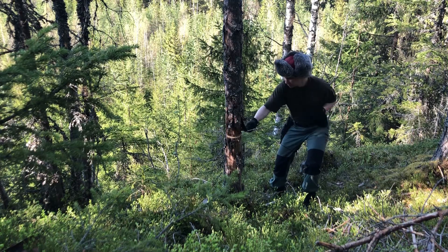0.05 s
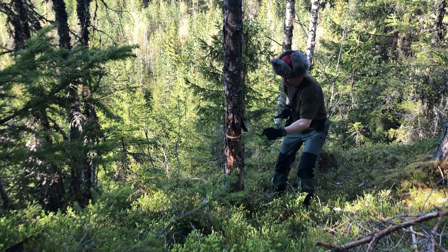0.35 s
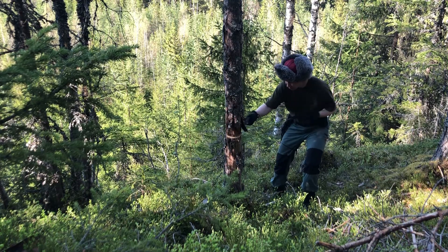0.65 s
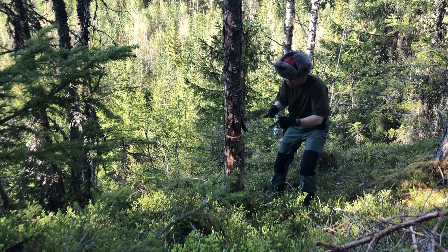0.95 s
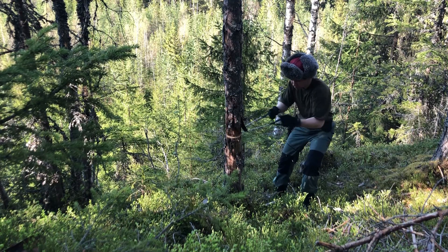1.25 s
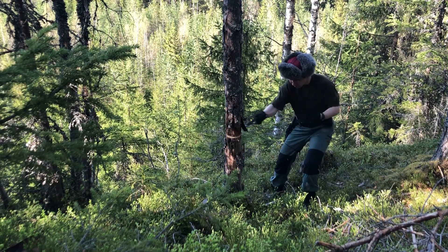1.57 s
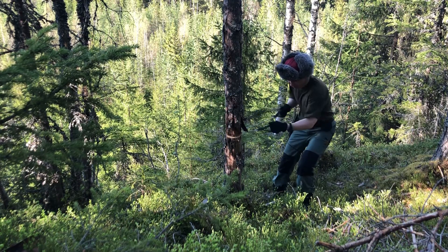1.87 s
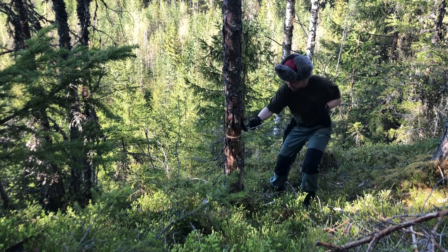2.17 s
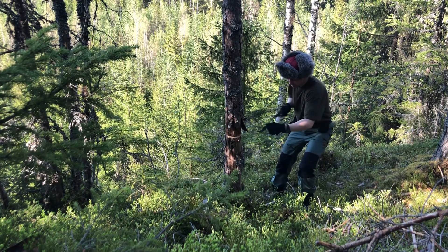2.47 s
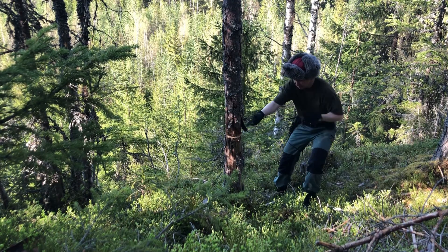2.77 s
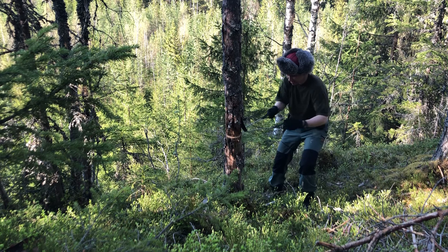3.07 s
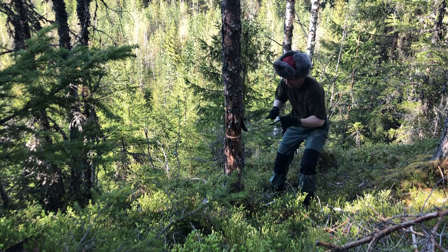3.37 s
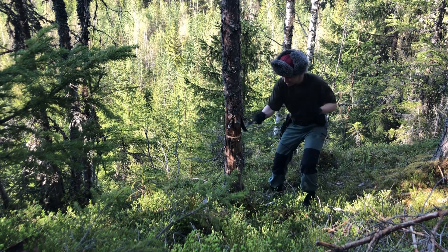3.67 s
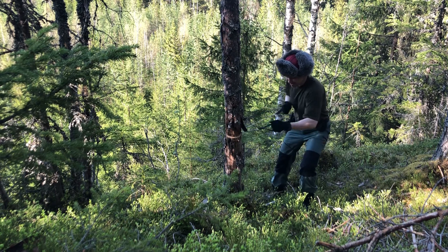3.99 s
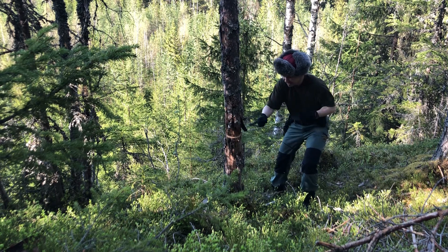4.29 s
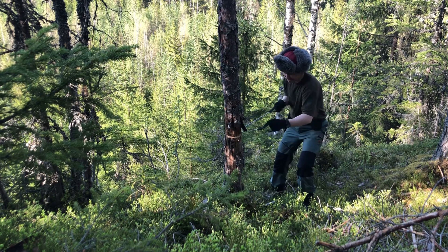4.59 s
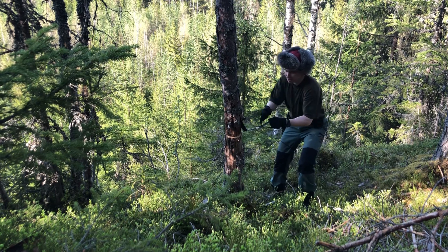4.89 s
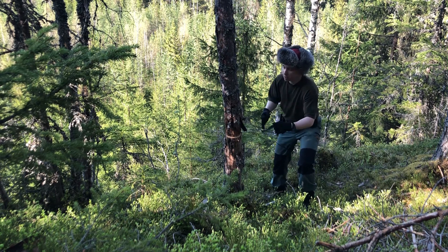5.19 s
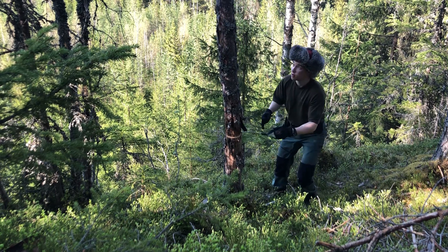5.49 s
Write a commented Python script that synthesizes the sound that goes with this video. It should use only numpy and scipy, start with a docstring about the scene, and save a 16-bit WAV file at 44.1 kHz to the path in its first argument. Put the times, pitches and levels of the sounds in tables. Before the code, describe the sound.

Quick, rasping pulls of a toothed chain cut dead wood in a forest, knocking and snapping fibres before stopping near the end.

```python
"""In a forest, a hand chain saw is pulled to and fro through a dead, dry trunk, nearly three pulls a second.
The teeth knock, rasp and snap fibres, the trunk drones under them, and the trees throw the sound back.
When the pulling stops, the trunk cracks, a small bird whistles far off and something swishes softly.
A faint hush of air lies under it all."""
import sys
import numpy as np
from scipy import signal
from scipy.io import wavfile
from scipy.ndimage import uniform_filter1d

SR = 44100
rng = np.random.default_rng(int(sys.argv[2]) if len(sys.argv) > 2 else 0)


def transcribe(u):
    """Save the signal u as a 16-bit wav file named by the first command-line argument.

    u: samples, shape (n,) or (channels, n), limited to [-1, 1]; the rate is SR.
    q: integer samples, one column per channel.
    """
    v = np.clip(np.atleast_2d(u).T, -1, 1)
    q = np.round(v * 32767).astype(np.int16)
    wavfile.write(sys.argv[1], SR, q)


N = 253134
TIME = np.arange(N) / SR


def amp(db):
    """Turns decibels into a number to multiply a sound by."""
    return 10 ** (np.asarray(db) / 20)


def unit(x):
    """Scales a sound to an average (rms) level of 1."""
    return x / np.sqrt(np.mean(x ** 2) + 1e-20)


def read(points, hz):
    """Looks up a frequency in a table, gliding between rows on a musical (log) scale."""
    row_hz, value = np.transpose(points)
    return np.interp(np.log(hz + 1), np.log(row_hz + 1), value)


def add(mix, s, sound):
    """Mixes a sound in, starting at s seconds."""
    part = mix[max(round(s * SR), 0):][:len(sound)]
    part += sound[:len(part)]


def colour(x, points, size=4096):
    """Gives a sound the balance of bass and treble in a table; only the table's shape counts."""
    log_gain = np.log(amp(read(points, abs(np.fft.fftfreq(size, 1 / SR)))))
    spectrum = np.exp(np.conj(signal.hilbert(log_gain)))  # rings after a hit, never before it
    response = np.fft.ifft(spectrum).real[:size // 2]
    return signal.oaconvolve(x, response / np.linalg.norm(response))[:len(x)]


def pull(stroke, bite_db_per_s, let_go_db_per_s, arch_db):
    """The strength of one pull: it bites in, rises and falls with the arm's speed, and lets go."""
    start, end, force_db, swell_db, _ = stroke
    from_middle = np.clip((TIME - start) / (end - start), 0, 1) - .5
    arch = arch_db * (2 * from_middle) ** 2
    fade = bite_db_per_s * np.maximum(start - TIME, 0) + let_go_db_per_s * np.maximum(TIME - end, 0)
    return amp(force_db + swell_db * from_middle - arch - np.minimum(fade, 100))


# The pulls of the chain. Each row: start in seconds, end in seconds, force in dB,
# swell from start to end in dB, fine chips compared with the force in dB.
PULLS = [(-0.18, 0.042, -25, -2, -7.5), (0.188, 0.411, -30, -5, -9), (0.557, 0.776, -29, -1, -8.5),
         (0.915, 1.117, -29, -2, -8), (1.248, 1.48, -28, 7.5, -7), (1.649, 1.845, -29.5, -6.5, -7),
         (1.973, 2.195, -27.5, 0, -6.5), (2.301, 2.55, -31.5, -5, -5), (2.67, 2.893, -30.5, 0.5, -4),
         (3.043, 3.236, -32, -1.5, -4), (3.375, 3.612, -30.5, 7.5, -7.5), (3.74, 3.925, -29.5, 0, -6),
         (4.077, 4.299, -32.5, 0.5, -3.5), (4.445, 4.642, -35, -3, -3.5)]


def effort():
    """How hard the arm drives the knocking wood, the rasping teeth and the fizzing chips."""
    knock, rasp, fizz = amp(-62), amp(-60), amp(-59)  # the slack chain drags between pulls
    for stroke in PULLS:
        cutting = pull(stroke, bite_db_per_s=450, let_go_db_per_s=546, arch_db=6)
        bumping = pull(stroke, bite_db_per_s=556, let_go_db_per_s=441, arch_db=6.5)
        knock = np.hypot(knock, amp(-4.5) * bumping)
        rasp = np.hypot(rasp, cutting)
        fizz = np.hypot(fizz, amp(stroke[-1]) * cutting)
    return knock, rasp, fizz


def bites(per_s, jitter, spread_db, rise_s, decay_s, slide):
    """Pressure on the wood: each tooth digs in and lets go, with steady sliding in between."""
    gaps, sizes = rng.standard_normal((2000, 2)).T
    at = np.cumsum(np.exp(jitter * gaps)) / per_s
    inside = at < TIME[-1]
    hits = np.zeros(N)
    hits[(at[inside] * SR).astype(int)] = amp(spread_db * np.clip(sizes[inside], -2, 2))
    for lag_s in (rise_s, decay_s):
        hits = signal.lfilter([1], [1, -np.exp(-1 / (lag_s * SR))], hits)
    pressure = slide + unit(hits)
    # the arm keeps the average force steady, however the teeth share it
    return pressure / np.sqrt(uniform_filter1d(pressure ** 2, size=2600))


def grains(per_s, spread_db, smooth):
    """Tiny breaks click at uneven sizes over the smooth hiss of rubbing."""
    size = amp(spread_db * np.minimum(rng.exponential(1, N), 4))
    clicks = size * (rng.random(N) < per_s / SR) * rng.choice([-1, 1], N)
    return unit(unit(clicks) + smooth * rng.standard_normal(N))


# The dull tone of knocked wood. Each row: frequency in Hz, relative strength in dB.
KNOCK_TONE = [(40, -47.5), (80, -21.5), (170, -9), (260, 0), (480, 2.5), (850, 1), (1200, -5.5),
              (2000, -22)]


def knocking(force):
    """The teeth bump through the cut with a dull, grainy rattle."""
    return colour(force * grains(per_s=1500, spread_db=3, smooth=0.49), KNOCK_TONE)


def ring(x, hz, width_hz):
    """Wood rings at one pitch when shaken; a smaller width rings longer."""
    decay = np.exp(-np.pi * width_hz / SR)
    turn = np.cos(2 * np.pi * hz / SR)
    ringing = signal.lfilter([1, -decay * turn], [1, -2 * decay * turn, decay ** 2], x)
    return np.sqrt(2 * (1 - decay ** 2)) * ringing


def trunk(force, pitches, travel_s=.018):
    """Bending waves run up the trunk and ring in it; the low ones arrive last."""
    drone = np.zeros(N)
    for hz, width_hz, db in pitches:
        # the teeth touch all round the cut, so each pitch is shaken in its own way
        shake = force * rng.standard_normal(N)
        add(drone, travel_s * np.sqrt(400 / hz), amp(db) * ring(shake, hz, width_hz))
    return drone


# The trunk's hollow ring and its deep shudder. Each row: pitch in Hz, width in Hz, relative level in dB.
TRUNK_RING = [(246, 70, -17), (312, 37, -9.5), (347.3, 15, -11.5), (384.2, 17.5, -9), (400.7, 24, -8.5),
              (436.2, 20, -8), (514, 18, -13.5), (581.3, 24, -14), (657.5, 26, -20), (727.3, 32, -12.5),
              (833, 42, -23), (887, 38, -14.5), (1079, 34, -10.5), (1243, 14, -15.5)]
TRUNK_SHUDDER = [(67.6, 19, -14), (89.7, 18, -19.5), (122.5, 8, -16.5)]


def droning(knock, teeth, moving):
    """The knocking teeth set the trunk ringing, and the whole stem shudders."""
    hollow = amp(-0.5) * trunk(knock * teeth, TRUNK_RING)
    sway = moving * amp(-6.5) * knock ** .75  # a power below 1 lets even a light pull shake it
    return hollow + trunk(sway, TRUNK_SHUDDER)


def splinters(per_s, length_s, spread_db, low_hz, high_hz):
    """Small splinters break off, each a tick with a pitch of its own."""
    t = np.linspace(-3, 3, round(6 * length_s * SR))  # time, counted in units of length_s
    when, pitch, size, phase = rng.random((round(per_s * N / SR), 4)).T[:, :, None]
    hz = low_hz + (high_hz - low_hz) * pitch
    height = amp(spread_db * np.minimum(-np.log(1 - size), 3.5))
    ticks = height * np.exp(-t ** 2 / 2) * np.sin(2 * np.pi * (hz * t * length_s + phase))
    at = (when * N).astype(int) + np.arange(len(t))
    return unit(np.bincount(at.ravel(), ticks.ravel(), N)[:N])


# The harsh tone of tearing wood. Each row: frequency in Hz, relative strength in dB.
RASP_TONE = [(400, 1), (900, 2), (1100, -5.5), (1400, -2.5), (1700, 6.5), (2100, 3), (2500, -1), (2800, 4),
             (3300, -11), (4000, -6), (5000, -15.5), (7000, -16), (12000, -43.5)]


def rasping(force):
    """The teeth tear grains and splinters out of the wood."""
    ticks = splinters(per_s=700, length_s=.00045, spread_db=3.5, low_hz=700, high_hz=4600)
    grit = grains(per_s=2500, spread_db=4.5, smooth=0.55)
    return colour(force * (amp(-4) * grit + amp(-8) * ticks), RASP_TONE)


# The bright tone of fine chips. Each row: frequency in Hz, relative strength in dB.
FIZZ_TONE = [(2000, 2.5), (4000, 4.5), (5500, 3.5), (7500, 1), (10000, -1), (12000, -6), (14000, 1.5),
             (15700, 1.5), (17000, -0.5)]


def fizzing(force):
    """Fine chips break away in a spray of tiny clicks."""
    return colour(force * grains(per_s=4100, spread_db=3, smooth=1.2), FIZZ_TONE)


def sawing(rest_s=4.82, settle_s=0.12):
    """The chain knocks, shakes the trunk, rasps and throws chips until it comes to rest."""
    knock, rasp, fizz = effort()
    moving = np.exp(-np.maximum(TIME - rest_s, 0) / settle_s)
    teeth = moving * bites(per_s=150, jitter=.7, spread_db=3, rise_s=.0011, decay_s=.0012, slide=.92)
    chips = moving * bites(per_s=90, jitter=.9, spread_db=13, rise_s=.0031, decay_s=.0031, slide=.59)
    dull = amp(-4.5) * knocking(knock * teeth)
    drone = droning(knock, teeth, moving)
    tearing = rasping(rasp * teeth)
    dust = amp(1.96) * fizzing(fizz * np.sqrt(teeth) * chips)
    return dull + drone + tearing + dust


# The tone of the forest air. Each row: frequency in Hz, relative strength in dB.
AIR_TONE = [(25, -8), (60, 4), (200, 9.5), (500, 3.5), (1000, -0.5), (2000, -4), (4500, -2.5), (6500, -7),
            (9000, -11), (13000, -8.5), (15700, -7)]


def air():
    """Still forest air makes a faint, steady hush."""
    return amp(-60.5) * colour(rng.standard_normal(N), AIR_TONE)


# The forest's echo. Each row: frequency in Hz, seconds to fade by 60 dB when stretch is 1.
ECHO_FADE = [(100, 0.97), (400, 0.47), (2000, 0.18), (6000, 0.31), (15000, 0.32)]


def echoes(x, stretch):
    """Stems and branches throw back many faint echoes; the bass lasts longest."""
    bounces = rng.choice([-1., 1.], SR) * (rng.random(SR) < 4000 / SR) * (TIME[:SR] > .004)
    hz, t, bands = signal.stft(bounces, SR, nperseg=128)
    fade_s = stretch * read(ECHO_FADE, hz)[:, None]
    tail = signal.istft(bands * amp(-60 * t / fade_s), SR, nperseg=128)[1]
    return signal.fftconvolve(x, tail / np.linalg.norm(tail))[:N]


def snap(crack_db, hz, edge_db, strain_s=.004, crack_s=.00038, edge_s=.00021, crumble_s=.0039):
    """A fibre strains, gives way with a wooden crack and a sharp edge of treble, then crumbles."""
    noise = rng.standard_normal((2, 1200))
    t = np.arange(noise.shape[1]) / SR - strain_s  # the fibre breaks at t = 0
    burst, spit = (np.exp(-.5 * ((t - .0009) / width) ** 2) for width in (crack_s, edge_s))
    debris = np.where(t < 0, .27 * (1 + t / strain_s), .19 * np.exp(-abs(t) / crumble_s))
    band = signal.butter(2, [hz * .55, min(hz * 1.8, SR / 3)], "band", fs=SR)
    grit = unit(signal.lfilter(*band, noise[0]))
    tone = np.sin(2 * np.pi * hz * t + np.pi * noise[0, 0])
    crack = 1.1 * burst * tone + (.7 * burst + debris) * grit
    edge = (spit + debris) * noise[1]
    head = (t > 0) & (t < .003)  # the first 3 ms of the break set the level
    return strain_s, amp(crack_db) * crack / np.std(crack[head]), amp(edge_db) * edge / np.std(edge[head])


def small_snaps(per_pull, margin=.2):
    """Lesser fibres give way at random in mid-pull, louder under more force; rows as in BIG_SNAPS."""
    rows = []
    for start, end, force_db, swell_db, _ in PULLS:
        places = rng.uniform(margin, 1 - margin, per_pull)
        for place, (size_db, pitch, edge) in zip(places, rng.standard_normal((per_pull, 3))):
            s = start + place * (end - start)
            db = force_db + swell_db * (place - .5) + size_db
            if s > 0:
                rows.append((s, db + 5, 2100 * np.exp(.17 * pitch), db - 7.5 + 3 * edge))
    return rows


# The loudest catches of the teeth and snaps of fibres. Each row: time in seconds,
# relative level of the crack in dB, its pitch in Hz, relative level of the sharp edge in dB.
BIG_SNAPS = [(0.0066, -18, 2180, -43), (0.1789, -24, 1976, -37), (0.1986, -18, 2090, -47),
             (0.2296, -20, 2540, -38), (0.2565, -26, 1790, -46), (0.3385, -21, 1740, -42),
             (0.532, -44, 2500, -36), (0.6019, -16, 2520, -24), (0.6271, -14.5, 2480, -45),
             (0.745, -14, 2150, -27), (0.8918, -31, 785, -56), (0.9169, -21.5, 1720, -46),
             (0.9204, -17, 2140, -32), (0.9778, -21.5, 1940, -41), (1.0422, -16.5, 2680, -45),
             (1.2254, -30.5, 870, -43), (1.2543, -27.5, 1450, -50), (1.3156, -14, 1930, -29),
             (1.3471, -15.5, 2940, -31), (1.3714, -20, 850, -19.5), (1.4053, -35.5, 2760, -20.5),
             (1.414, -20, 2380, -25.5), (1.4255, -17.5, 2120, -42.5), (1.4534, -11.5, 2170, -48),
             (1.6531, -15.5, 2085, -47), (1.7136, -22, 1900, -29), (1.7453, -14, 1970, -43.5),
             (1.7702, -20.5, 2630, -46), (1.802, -24, 2280, -25), (1.9635, -26.5, 1330, -32),
             (2.019, -10, 2080, -34), (2.0503, -12, 2800, -19.5), (2.0763, -18.5, 1960, -26),
             (2.1162, -19, 2120, -38), (2.1591, -16, 2260, -34), (2.1692, -20, 3320, -19),
             (2.2903, -20, 1900, -55), (2.375, -28, 1797, -25), (2.433, -23, 1860, -38),
             (2.467, -25.5, 2660, -24), (2.7203, -23.5, 2080, -39), (2.811, -40, 3800, -12.5),
             (2.8337, -12, 3050, -46), (2.8473, -21.5, 2030, -44), (2.901, -45, 2500, -27),
             (3.051, -20.5, 2000, -43), (3.1425, -16, 2420, -28), (3.3506, -31, 1865, -59),
             (3.4014, -20, 1590, -24.5), (3.495, -18.5, 2860, -24), (3.5229, -19, 2870, -16.5),
             (3.5485, -12, 2350, -45), (3.6098, -26, 3410, -22), (3.8408, -19.5, 2600, -39),
             (4.0466, -23, 2550, -30), (4.0898, -20, 4230, -11), (4.1452, -15.5, 1840, -28),
             (4.1519, -20, 1650, -28), (4.2025, -23, 2060, -43), (4.2448, -26, 1680, -18),
             (4.2846, -24, 1890, -45), (4.49, -24, 2197, -24), (4.5253, -21, 1880, -23),
             (4.5345, -30, 2820, -17), (4.5694, -17, 1890, -32), (4.5977, -39, 1510, -32),
             (4.7674, -37, 1270, -37), (4.7826, -45, 1970, -37), (4.8504, -52, 3280, -43),
             (4.9083, -51, 4150, -49.5), (5.026, -47, 4400, -37), (5.119, -41.5, 3250, -35),
             (5.1315, -30.5, 2690, -25.5)]
# The tone of that sharp edge. Each row: frequency in Hz, relative strength in dB.
EDGE_TONE = [(2000, -14), (3500, -6), (5000, -7), (7000, -5), (10000, -4.5), (12000, -6.5), (15000, -2.5),
             (17000, -0.5)]


def snapping():
    """Fibres break: their cracks also thump the trunk, while their sharp edges carry no bass."""
    cracks, edges = np.zeros((2, N))
    for s, crack_db, hz, edge_db in list(BIG_SNAPS) + small_snaps(per_pull=2):
        strain_s, crack, edge = snap(crack_db, hz, edge_db)
        add(cracks, s - strain_s, crack)
        add(edges, s - strain_s, edge)
    edges = signal.sosfilt(signal.butter(3, 2600, "high", fs=SR, output="sos"), edges)
    thump = amp(-12.5) * colour(abs(cracks) * rng.standard_normal(N), KNOCK_TONE)
    ringing = amp(-16) * trunk(abs(cracks), TRUNK_RING)
    return amp(-1.66) * cracks + thump + ringing + colour(edges, EDGE_TONE)


# The bird's song. Each row: start in seconds, length in seconds, relative level in dB, glide number.
BIRD_NOTES = [(4.847, 0.08, -70, 0), (4.979, 0.058, -66, 0), (5.106, 0.07, -58, 0), (5.224, 0.062, -64, 0),
              (5.355, 0.072, -61, 1), (5.53, 0.093, -62.5, 1)]
# Glide 0 dips and rises, glide 1 falls. Each row: pitches in Hz, evenly spaced through the note.
BIRD_GLIDES = [(4050, 3450, 3120, 3400, 3830, 3900, 3650), (3780, 3650, 3520, 3400, 3270, 3130, 3000)]


def bird():
    """A small bird gives thin whistles: four dip and rise, then two fall; each fades toward its end."""
    song = np.zeros(N)
    for s, length, db, glide in BIRD_NOTES:
        progress = np.linspace(0, 1, round(length * SR))
        pitches = BIRD_GLIDES[round(glide)]
        hz = np.interp(progress, np.linspace(0, 1, len(pitches)), pitches)
        swell = np.sqrt(abs(np.sin(np.pi * progress))) * amp(-5 * progress)
        whistle = np.sin(2 * np.pi * np.cumsum(hz) / SR)
        add(song, s, amp(db) * unit(swell * whistle))
    return song


# The rise and fall of the swish. Each row: time in seconds, level in dB.
SWISH_LEVEL = [(5.29, -76), (5.34, -44.5), (5.38, -47), (5.42, -50.5), (5.5, -53.5), (5.56, -50),
               (5.62, -65), (5.74, -63.5)]
# Its tone. Each row: frequency in Hz, relative strength in dB.
SWISH_TONE = [(200, -3.5), (1000, -3.5), (2500, -3.5), (5000, 1.5), (7500, -2.5), (10000, 0), (13000, 2.5),
              (15700, 4.5)]


def swish():
    """A soft, grainy hiss swells and fades after the last crack."""
    level = amp(np.interp(TIME, *np.transpose(SWISH_LEVEL), left=-120))
    return colour(level * grains(per_s=6000, spread_db=4, smooth=1.5), SWISH_TONE)


def scene():
    """The saw a few metres off among the trees, with the far bird, the air and the swish."""
    saw = sawing() + snapping()
    thicket = amp(-13.5) * echoes(saw, stretch=0.16)
    woods = amp(-31) * echoes(saw, stretch=1.3)
    song = bird()
    far_song = amp(-2) * song + amp(-8) * echoes(song, stretch=1.2)
    return (amp(-1.58) * saw + thicket + woods + far_song + air() + swish())[None]


def record(dry, low_hz=52, high_hz=15900):
    """Trims away the deepest bass and the highest treble."""
    thin = signal.sosfilt(signal.butter(4, low_hz, "high", fs=SR, output="sos"), dry)
    treble_cut = signal.firwin(401, high_hz, window=("kaiser", 8), fs=SR)
    return signal.oaconvolve(thin, treble_cut[None], "same")


dry = scene()
out = record(dry)
transcribe(out)
```